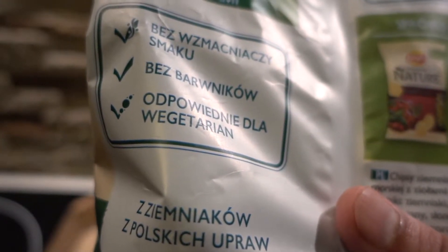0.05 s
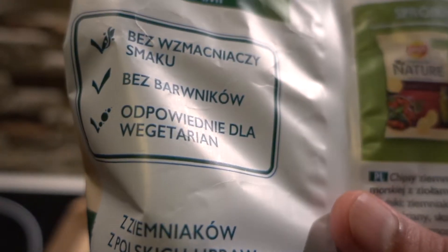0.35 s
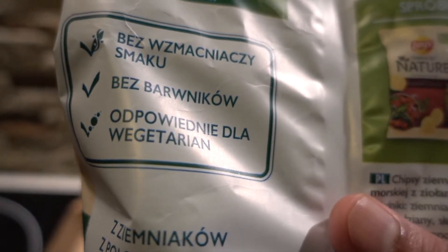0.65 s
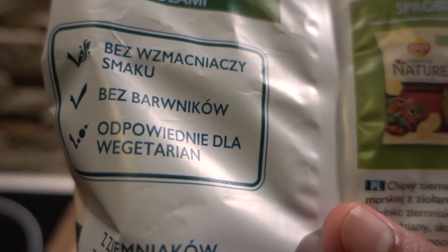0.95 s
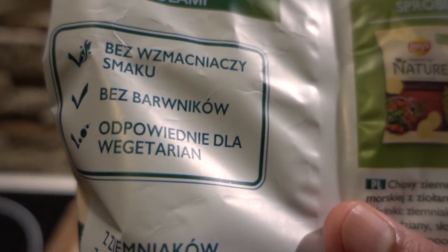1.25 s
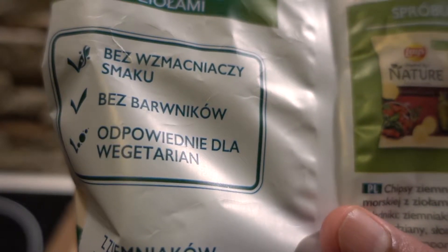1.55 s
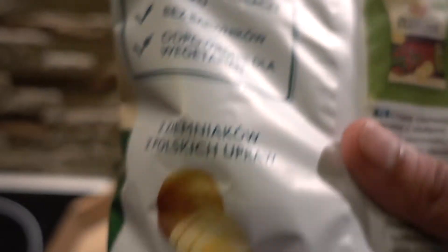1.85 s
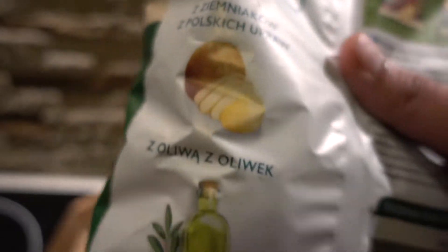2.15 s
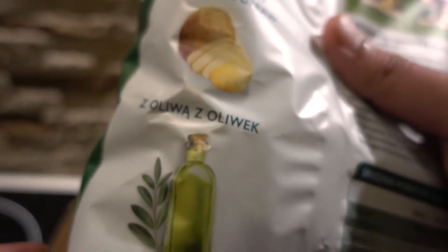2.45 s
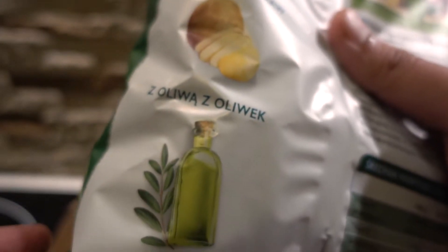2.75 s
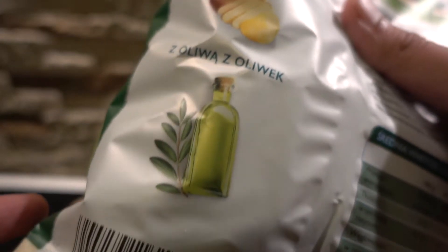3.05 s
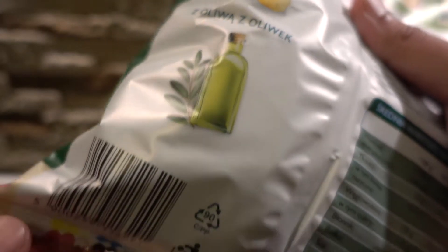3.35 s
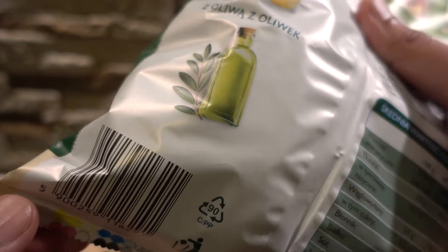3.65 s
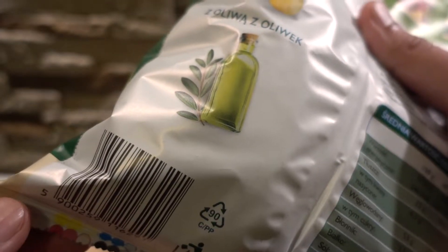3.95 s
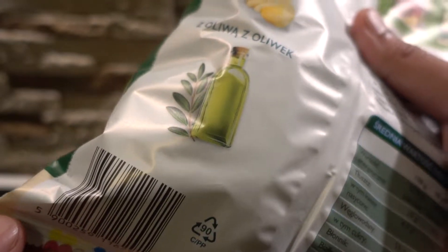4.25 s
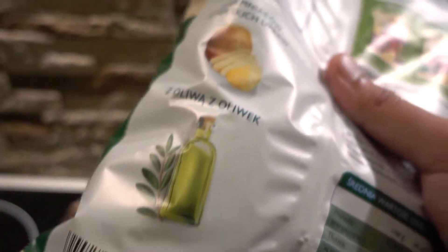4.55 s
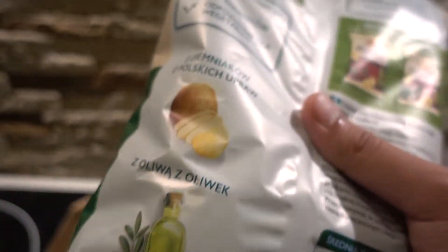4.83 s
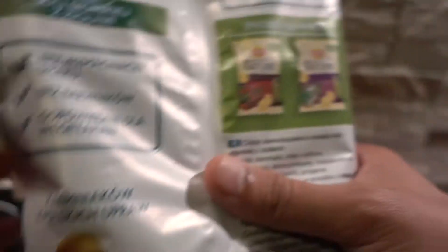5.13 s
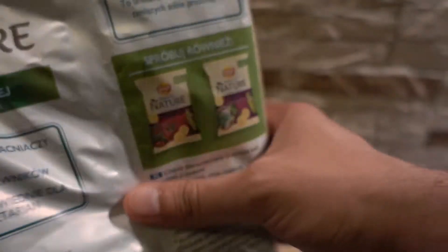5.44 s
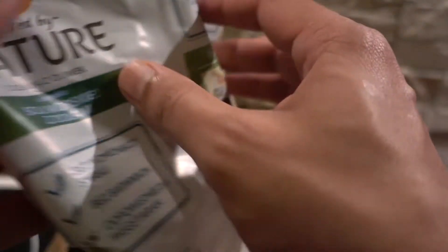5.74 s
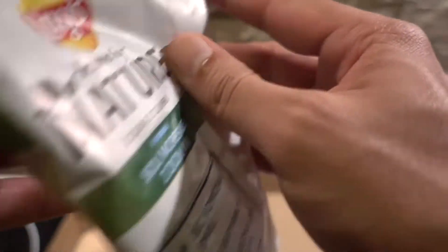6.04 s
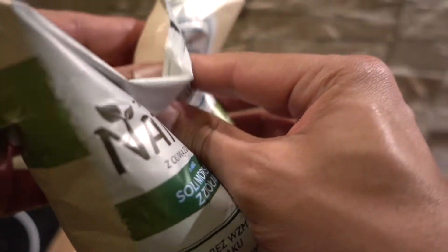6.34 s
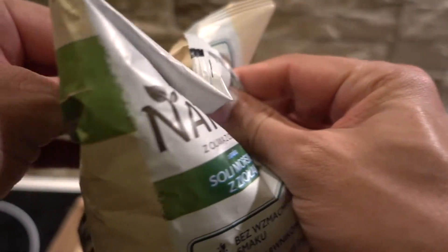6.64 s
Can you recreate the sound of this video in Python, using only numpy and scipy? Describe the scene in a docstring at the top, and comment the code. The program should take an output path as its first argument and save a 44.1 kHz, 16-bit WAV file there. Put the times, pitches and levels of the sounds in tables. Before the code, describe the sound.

A fridge hums low and steady in a small kitchen while a foil-lined snack bag is handled close to a stereo microphone. During the first second it crinkles lightly, with a few crisp snaps. After a short lull, more crinkling comes from about 1.7 to 2.7 seconds, with a dull bump of fingers on the air-filled bag near 1.9. Another light burst runs from 3 to 3.8 seconds, followed by a pause with only faint ticks. The rustling returns around 4.5 seconds and builds. From about 5.2 seconds the bag is gripped and pulled: the crackle turns loud, dense and bright, full of sharp snaps and several soft, hollow thumps. Near 6.6 seconds the taut seam slips between the fingertips with a brief rasp, and the crackling carries on to the end, just before 7 seconds. The room adds a short echo.

```python
"""A fridge hums in a small kitchen. Close to a stereo microphone, a foil-lined snack bag is turned over:
the film buckles in swarms of small creases and in single snaps, each ringing a patch of film. The air
inside resonates, the room answers briefly, and near 1.9 s a push of the fingers thumps the bag.
From about 5.2 s it is gripped and pulled: the crackle grows loud and dense, with more snaps and thumps.
Near 6.6 s the taut top seam slips between the fingertips with a stick-slip rasp."""
import sys
import numpy as np
from scipy import signal
from scipy.fft import rfft, irfft, next_fast_len
from scipy.io import wavfile
from scipy.ndimage import uniform_filter1d

SR = 44100
rng = np.random.default_rng(int(sys.argv[2]) if len(sys.argv) > 2 else 0)


def unload_wav(signal):
    """Save mono or channel-first audio to the path in sys.argv[1] as 16-bit WAV at rate SR, clipped to [-1, 1]."""
    wavfile.write(
        sys.argv[1],
        SR,
        np.round(np.clip(np.atleast_2d(signal).T, -1, 1) * 32767).astype(np.int16),
    )


N = 299439
TIME = np.arange(N) / SR


def undb(db):
    """Decibels to amplitude ratio."""
    return 10 ** (np.asarray(db) / 20)


def unit(x):
    """Normalisation to a mean energy of one per channel."""
    return x / np.sqrt(np.mean(np.sum(x ** 2, axis=-1)))


def contour(points, f):
    """Gain at f, interpolated in log frequency between points (f/Hz, level/dB)."""
    hz, db = np.transpose(points)
    return undb(np.interp(np.log(f + 1), np.log(hz), db))


def shaped(x, gain):
    """Linear filtering: the spectrum is multiplied by gain(f)."""
    size = x.shape[-1]
    padded = next_fast_len(size)
    return irfft(rfft(x, padded) * gain(np.fft.rfftfreq(padded, 1 / SR)), padded)[..., :size]


def band(x, lo_hz, hi_hz, order=4):
    """Causal band-pass filter."""
    sos = signal.butter(order, [lo_hz, min(hi_hz, .45 * SR)], "band", fs=SR, output="sos")
    return signal.sosfilt(sos, x)


def resonance(f, hz, width):
    """Complex response of a damped resonator, 1 at its centre."""
    return 1 / (1 + 2j * (f - hz) / width)


def wander(bandwidth_hz):
    """Low-pass random fluctuation of unit RMS."""
    return np.sqrt(N) * unit(shaped(rng.standard_normal(N), lambda f: np.exp(-f / bandwidth_hz)))


def add(out, s, sound):
    """Superposition: mix a sound in at time s."""
    i = max(int(s * SR), 0)
    part = sound[..., :max(N - i, 0)]
    out[:, i:i + part.shape[-1]] += part


# Spectrum of the steady room noise: f/Hz, relative level/dB
ROOM_NOISE = [(20, -7), (44, 0), (56, 3.5), (150, 2), (260, -10), (400, -12), (650, -16), (1000, -25),
              (2300, -37.5), (6000, -44), (15500, -49.5)]
# Left-right difference of the room sound: f/Hz, side level re mid/dB
ROOM_SIDE = [(30, -36), (90, -76), (300, -19), (1000, -8), (3000, -1.5), (15000, 2.5)]
# Tones of the fridge compressor: f/Hz, level/dB
COMPRESSOR_TONES = [(32.3, -71), (80.8, -41.5), (129.3, -51.5), (177.8, -56)]
# Resonances of the fridge housing: f/Hz, nominal width/Hz, level/dB
HOUSING_MODES = [(346, 16.3, -52.5), (1737, 61, -71)]
def fridge_and_room_noise(noise_db=-41, waver_rad=0.098):
    """Forced vibration: a compressor hums and its housing sings faintly over diffuse room noise."""
    mid, side, drive = rng.standard_normal((3, N))
    side = shaped(side, lambda f: contour(ROOM_SIDE, f))
    air = np.sqrt(N) * unit(shaped(np.array([mid + side, mid - side]), lambda f: contour(ROOM_NOISE, f)))
    drift = waver_rad * wander(5.8)
    hum = sum(undb(db) * np.sqrt(2) * np.sin(2 * np.pi * (hz * TIME + rng.random()) + drift)
              for hz, db in COMPRESSOR_TONES)
    whine = sum(undb(db) * np.sqrt(N) * unit(shaped(drive, lambda f: resonance(f, hz, 2 * width) ** 2))
                for hz, width, db in HOUSING_MODES)
    return undb(noise_db) * air + hum + whine


# Spectrum of the crumpling film: f/Hz, relative level/dB
FILM_SPECTRUM = [(80, -22.5), (150, 7.5), (300, -2), (500, -5.5), (1200, -0.5), (2200, 1), (4200, -2),
                 (7000, 0), (15500, -6.5)]
def creases(ring_hz, flutter_s, ring_db, tick, ragged_db, cycles, wide_hz=2800, width=0.71):
    """Impulse response of each crease: a tick, a flutter of bending waves and a damped ring."""
    t = np.arange(1024) / SR
    f = np.fft.rfftfreq(len(t), 1 / SR)
    hz = np.asarray(ring_hz, float)[:, None]
    mid, side = np.moveaxis(rng.standard_normal((len(hz), 2, len(t))), 1, 0) * np.exp(-t / flutter_s)
    mid[:, 0] += tick
    # short waves radiate in all directions and reach the two channels differently
    side = width * signal.sosfilt(signal.butter(2, wide_hz, "high", fs=SR, output="sos"), side)
    # each patch colours the spectrum its own way; folding the cepstrum makes the response causal
    knots_hz = np.geomspace(200, 16000, 14)
    ripples_db = ragged_db * rng.standard_normal((len(hz), len(knots_hz)))
    patch_colour = np.array([contour(np.c_[knots_hz, ripple], f) for ripple in ripples_db])
    cepstrum = irfft(np.log(contour(FILM_SPECTRUM, f) * patch_colour))
    cepstrum[:, 1:len(t) // 2] *= 2
    cepstrum[:, len(t) // 2 + 1:] = 0
    excitation = np.stack([mid + side, mid - side], axis=1)
    crack = irfft(rfft(excitation) * np.exp(rfft(cepstrum))[:, None])
    # large patches ring lower and longer
    ring = np.sin(2 * np.pi * hz * t) * np.exp(-t * hz / cycles)
    return [unit(c) + undb(ring_db) * unit(r) for c, r in zip(crack, ring)]


def registers(x, body_hz=700, sizzle_hz=4500):
    """A filter bank splits film sound into hollow body, crack and sizzle."""
    return band(x, 181, body_hz), band(x, body_hz, sizzle_hz), band(x, sizzle_hz, SR / 2)


# Light turns of the bag, one curve each: t/s, flexing level/dB, relative sizzle/dB
TURNS = [
    [(0.1, -66, -3), (0.23, -61, -12), (0.39, -45.5, 2), (0.47, -50.5, -12), (0.6, -48, -7),
     (0.68, -61, -2)],
    [(0.74, -51.5, -11), (0.82, -44, -5), (0.9, -50.5, -6), (1.02, -70, -3)],
    [(1.66, -60, -12), (1.74, -41.5, -2), (1.83, -45, -2), (1.895, -37, -5), (1.96, -50, -9),
     (2.06, -50.5, -6), (2.12, -67, -7)],
    [(2.13, -52, -1), (2.18, -51, -7.5), (2.3, -59.5, -2), (2.44, -54, -7), (2.54, -70, 2)],
    [(2.95, -70, -4), (3.03, -49.5, -7.5), (3.24, -49.5, -8), (3.34, -42, -2.5), (3.45, -45, 2.5),
     (3.51, -55, -2)],
    [(3.52, -46.5, -3), (3.58, -38, -4.5), (3.65, -47, 3), (3.72, -58.5, -5), (3.82, -74, 0)],
    [(4.53, -62, -2), (4.73, -55, -3), (4.81, -44, -6), (4.95, -43, 2.5), (5.01, -42.5, -10),
     (5.1, -41.5, -7), (5.18, -36, -5), (5.25, -42.5, -5)],
]
# Gentle flexing moves whole panels and sounds hollow: flexing level/dB, relative body/dB
TURN_BODY = [(-77, 0.5), (-50, -0.5), (-51, -4.5), (-42, -3.5)]
# The hard grip and pull: t/s, flexing level/dB, relative body/dB, relative sizzle/dB
GRIP = [(5.245, -40, -7, -8), (5.253, -41.5, -1, -13), (5.269, -24, -13, -8), (5.407, -21, -6, -4),
        (5.533, -22.5, -7, -4.5), (5.597, -32.5, 0, 9.5), (5.613, -28, -5, -7), (5.661, -32, -4, -18),
        (5.675, -19, -9.5, -9), (5.725, -26.5, -5.5, 1), (5.881, -21, -11, -3), (5.937, -28.5, -6.5, -5.5),
        (6.079, -25, -6, 1), (6.327, -22, -13.5, -2), (6.561, -29, -5.5, 6.5), (6.615, -27, -8, 1.5),
        (6.771, -25, -9.5, -2.5), (6.79, -22.5, -17.5, 6)]
def flexing(rest_db=-81.0, turn_trim_db=-0.5, grip_trim_db=-2):
    """Envelopes of the excitation in dB (level, body, sizzle): at rest, turned lightly, then gripped."""
    flex_db, sizzle_db = np.full(N, rest_db), np.zeros(N)
    for turn in TURNS:
        s, level, sizzle = np.transpose(turn)
        now = (TIME >= s[0]) & (TIME <= s[-1])
        flex_db[now] = np.interp(TIME[now], s, level) + turn_trim_db
        sizzle_db[now] = np.interp(TIME[now], s, sizzle)
    body_db = np.interp(flex_db, *np.transpose(TURN_BODY))
    s, level, body, sizzle = np.transpose(GRIP)
    gripped = TIME > TURNS[-1][-1][0]
    for envelope, points in (flex_db, level + grip_trim_db), (body_db, body), (sizzle_db, sizzle):
        envelope[gripped] = np.interp(TIME[gripped], s, points)
    return flex_db, body_db, sizzle_db


def strain_of(flex_db):
    """Strain on a scale of 0 to 1, rising with the flexing level."""
    return np.interp(flex_db, [-42, -27], [0, 1])


def crackle(flex_db, body_db, sizzle_db, count=400, idle_per_s=450, hard_per_s=1600, trim_db=-1):
    """Crackling noise: small creases buckle as a Poisson process whose rate rises with strain."""
    strain = strain_of(flex_db)
    rate = idle_per_s + strain * (hard_per_s - idle_per_s)
    spread_db = 4 + 0.5 * strain
    chance, size, sign = rng.random(N), rng.exponential(size=N), rng.choice([-1, 1], N)
    clicks = (chance < rate / SR) * sign * undb(spread_db * np.minimum(size, 3.06))
    ring_hz = np.geomspace(400, 5200, count)
    patches = creases(ring_hz, flutter_s=0.0041, ring_db=-8, tick=5.4, ragged_db=5, cycles=4)
    # taut film rings higher; a fold travels, so creases close in time ring at similar pitches
    pitch_rank = .52 + .12 * strain + .16 * wander(18) + .12 * rng.standard_normal(N)
    patch = (pitch_rank * count).astype(int) % count
    swarm = np.zeros((2, N))
    for i in np.flatnonzero(clicks):
        add(swarm, i / SR, clicks[i] * patches[patch[i]])
    out = 0
    for layer, colour_db in zip(registers(swarm), (body_db + 1, 0, sizzle_db)):
        # the hands set the power; the creases only share it out
        power = uniform_filter1d(np.mean(layer ** 2, axis=0), size=1500)
        out = out + layer / np.sqrt(np.abs(power) + 1e-9) * undb(flex_db + colour_db + trim_db)
    return out


# Single snaps of the film, faint to loud:
# t/s, crack level/dB, ring f/Hz, relative body/dB, relative sizzle/dB
SNAPS = [(0.1224, -50.5, 794, -17, -25), (0.228, -42, 1230, -1, -30), (0.3095, -27, 1610, -19, -2),
         (0.3683, -31, 3180, -5, -2.5), (0.504, -42, 1220, -5, -20), (0.7038, -44, 1270, 3, 0),
         (0.778, -28.5, 650, -2, -5.5), (0.7876, -29, 1110, -1.5, -9), (0.798, -33, 1980, -11, -28),
         (1.3536, -52.5, 1590, 6, -36), (1.706, -37.5, 1970, -2, -37), (1.7685, -39, 1260, -0.5, -28),
         (1.8802, -37, 1750, -17, -19), (2.006, -33.5, 2770, -1.5, -12), (2.144, -50, 1940, -12, -3),
         (2.1646, -46.5, 3090, -5, 0), (2.1883, -46, 4150, -17, -8), (2.2234, -47.5, 2470, -17, -12),
         (2.2905, -44.5, 774, -9, -12), (2.3495, -45, 1660, -9, -21), (2.435, -45, 800, -5, -18.5),
         (2.5944, -38.5, 2000, -27, -7.5), (2.699, -29, 1156, -40, -7), (3.04, -39, 3800, 4, -10),
         (3.3294, -28.5, 1740, -29, -6.5), (3.353, -37, 3930, -8, -1), (3.4231, -29.5, 3670, -10, -0.5),
         (3.4618, -32.5, 1060, -16, -15), (4.0053, -63, 604, -10, 5), (4.3167, -65.5, 600, 11, 12.5),
         (4.3618, -39, 4020, -28, -5), (4.4661, -50, 4630, 7, 0), (4.582, -44.5, 714, 5, -9),
         (4.6092, -42.5, 2000, -20, -4), (4.67, -38.5, 4000, -11, -6.5), (4.8072, -36.5, 2500, -2.5, -6),
         (4.9374, -27.5, 1170, -10, -11), (5.0087, -31.5, 3660, -7, -6), (5.156, -20.5, 1110, -18, -7),
         (5.2077, -33, 1300, -17, -9.5), (5.271, -23.5, 3230, -25, -20), (5.2889, -20, 615, -13, -7),
         (5.306, -29, 2220, -22, 7), (5.3822, -22.5, 1410, -1, -1), (5.4473, -27, 2940, -17, -6),
         (5.4721, -34, 4460, -9, 13.5), (5.608, -27, 4270, -17, -16), (5.6248, -26, 1100, -5, -1),
         (5.673, -24.5, 2750, -35, -2), (5.7042, -28, 4430, -18, 4), (5.727, -25, 3030, -22, 2.5),
         (5.764, -20, 4690, -12, -14), (5.812, -25, 4270, -28, -2), (5.8934, -22.5, 1350, -3.5, -22),
         (5.923, -31, 3400, -19, 8), (5.9766, -31, 4200, -17, 5.5), (6.011, -22, 3930, -14, -1.5),
         (6.052, -27.5, 5600, -4, 7.5), (6.17, -22, 2100, -9, -16), (6.2, -30.5, 3850, -24, 11),
         (6.211, -28, 4360, -24, -11), (6.2447, -20.5, 1290, -12, -12), (6.271, -36.5, 4800, -22, 16),
         (6.3162, -25, 1340, -29, -18), (6.331, -22.5, 2030, -4, -17), (6.3516, -23.5, 2830, -23, 2),
         (6.395, -25, 900, 2, -15), (6.433, -30.5, 2900, -4, 5), (6.494, -34, 5200, -20, 12.5),
         (6.564, -40, 3520, -18, 0), (6.5983, -27.5, 1970, -23, 3), (6.675, -24, 5270, -24, 2),
         (6.7084, -23, 2730, -28, -6), (6.773, -23.5, 2710, -8, -14)]
def snaps(flex_db, level_window_s=.008, body_trim_db=-1, dull_hz=6000, bright_hz=17000):
    """Snap-through buckling: a single crease flips a patch of film and rings it."""
    out = np.zeros((2, N))
    extra, gives_way = random_grip_snaps(flex_db)
    rows = np.vstack([SNAPS, extra])
    sounding = np.r_[np.ones(len(SNAPS), bool), gives_way]
    responses = creases(rows[:, 2], flutter_s=0.0036, ring_db=-5, tick=1.3, ragged_db=2.5, cycles=1.6)
    bands = registers(np.array(responses)[sounding])
    for (s, level_db, _, body_db, sizzle_db), body, crack, sizzle in zip(rows[sounding], *bands):
        # stronger sizzle reaches higher into the treble
        top_hz = np.interp(sizzle_db, [-6, 0], [dull_hz, bright_hz])
        sizzle = signal.sosfilt(signal.butter(2, top_hz, fs=SR, output="sos"), sizzle)
        snap = unit(crack) + undb(body_db + body_trim_db) * unit(body) + undb(sizzle_db) * unit(sizzle)
        add(out, s, undb(level_db) * np.sqrt(level_window_s * SR) * snap)
    return out


def stick_and_give(jerk_db=1.31, jerk_hz=12, hold_db=-2.5, hold_s=0.0053):
    """Amplitude modulation: crackle comes in jerks and dips as strain builds before each listed snap."""
    t = np.arange(SR // 20) / SR
    hold = np.zeros((1, N))
    for s, *_ in SNAPS:
        add(hold, s - t[-1], np.exp(-(t[::-1] / hold_s) ** 2))
    return undb(jerk_db * wander(jerk_hz) + hold_db * np.minimum(hold, 1))


# Modes of the air inside the bag: f/Hz, width/Hz, level re the film's sound/dB
CAVITY_MODES = [(362.7, 29, -1), (580, 15, -22), (850, 15, -14), (1132, 80, -18.5), (1290, 30, -3)]
def cavity(film):
    """Cavity resonance: the film drives the modes of the enclosed air."""
    return shaped(film.mean(axis=0),
                  lambda f: sum(undb(db) * resonance(f, hz, width) for hz, width, db in CAVITY_MODES))


def kitchen(x, t60_s=.48, tail_db=-5.5, treble_db=-1, early_db=-14, early_s=0.02, gap_s=0.0007):
    """Reverberation: early reflections from worktop and wall, and an exponentially decaying tail."""
    t = np.arange(SR // 2) / SR
    mid, side = rng.standard_normal((2, len(t)))
    side = shaped(side, lambda f: contour(ROOM_SIDE, f))
    echoes = np.array([mid + side, mid - side]) * np.clip(t / gap_s - 1, 0, 1)
    treble = undb(treble_db) * band(echoes, 7200, 14600, order=2)
    tail = (band(echoes, 200, 9600, order=1) + treble) * undb(-60 * t / t60_s)
    early = band(echoes, 300, 6300, order=1) * np.exp(-t / early_s)
    response = 0.62 * (undb(tail_db) * unit(tail) + undb(early_db) * unit(early))
    return signal.fftconvolve(x, response, axes=1)[:, :N]


# Pushes of the fingers on the air-filled bag: t/s, relative level/dB, f/Hz
PUSHES = [(1.891, -11.5, 321), (5.391, -8.5, 377), (5.425, -7, 187), (5.707, -13, 220), (6.168, -16.5, 284),
          (6.257, -7.5, 390), (6.395, -14, 404), (6.464, -8.5, 189)]
def thumps(decay_s=0.0043, push_s=0.0028, trim_db=-3):
    """Heavily damped oscillation: the cushion of air answers each push with a dull bump."""
    out, t = np.zeros((2, N)), np.arange(4096) / SR
    envelope = (1 - np.exp(-t / push_s)) * np.exp(-t / decay_s)
    for s, db, hz in PUSHES:
        add(out, s, undb(db + trim_db) * np.sin(2 * np.pi * hz * t) * envelope)
    return out


# The bag swings slightly left as it is gripped: t/s, treble level left re right/dB
SWING = [(4.7, .1), (5.3, 1.4)]
def swing(film, corner_hz=400):
    """Level-difference panning: with closely spaced capsules, only short waves are louder in one."""
    left_db = np.interp(TIME, *np.transpose(SWING))
    gains = undb(np.array([left_db, -left_db]) / 2)
    return film + shaped(film, lambda f: f / (f + corner_hz)) * (gains - 1)


def random_grip_snaps(flex_db, count=60, max_per_s=26, low_hz=1900, high_hz=4200):
    """Random buckling in the grip, likelier with strain: extra rows as in SNAPS, and which sound."""
    when, chance, pitch = rng.random((count, 3)).T
    size, colour = rng.standard_normal((count, 2)).T
    slot_s = (GRIP[-1][0] - GRIP[0][0]) / count
    s = GRIP[0][0] + (np.arange(count) + when) * slot_s
    level_db = -29 + 1.3 * size
    ring_hz = low_hz * (high_hz / low_hz) ** pitch
    body_db, sizzle_db = np.full(count, -14), 3.5 + 4 * np.tanh(colour)
    gives_way = chance < max_per_s * slot_s * strain_of(np.interp(s, TIME, flex_db))
    return np.c_[s, level_db, ring_hz, body_db, sizzle_db], gives_way


# The seam slips between the fingertips: t/s, level/dB
SLIP = [(6.575, -55), (6.587, -27), (6.64, -22), (6.68, -55)]
# Resonances of the taut seam: f/Hz, nominal width/Hz, relative level/dB
SEAM_MODES = [(3100, 820, 3), (11700, 2000, -1)]
def seam(slips_per_s=290, jitter=.2, decay_cycles=0.52):
    """Stick-slip friction: uneven bursts of noise excite the resonances of the taut seam."""
    phase = np.cumsum(slips_per_s * (1 + jitter * wander(120))) / SR % 1
    mid, side = rng.standard_normal((2, N)) * np.exp(-phase / decay_cycles)
    friction = np.array([mid + side / 2, mid - side / 2])
    rasp = shaped(friction, lambda f: sum(undb(db) * resonance(f, hz, 2 * width) ** 2
                                          for hz, width, db in SEAM_MODES))
    level_db = np.interp(TIME, *np.transpose(SLIP), left=-np.inf, right=-np.inf)
    return np.sqrt(N) * unit(rasp) * undb(level_db)


def scene():
    """Superposition of the bag's direct sound, its reverberation and the steady background."""
    flex_db, body_db, sizzle_db = flexing()
    film = snaps(flex_db) + crackle(flex_db, body_db, sizzle_db) * stick_and_give() + seam()
    bag = swing(film) + cavity(film) + thumps()
    return bag + kitchen(bag) + fridge_and_room_noise()


def record(dry):
    """Band limiting: a steep low-pass removes the treble above 16.1 kHz."""
    return signal.sosfilt(signal.ellip(10, .1, 80, 16100, fs=SR, output="sos"), dry)


dry = scene()
out = record(dry)
unload_wav(out)
```